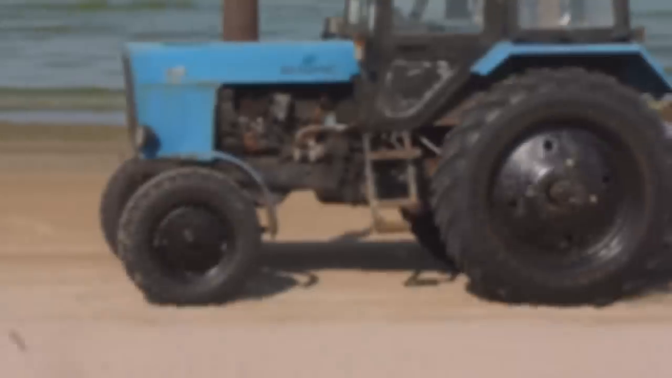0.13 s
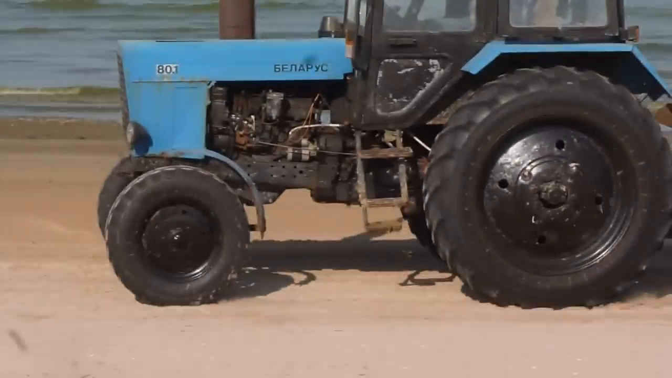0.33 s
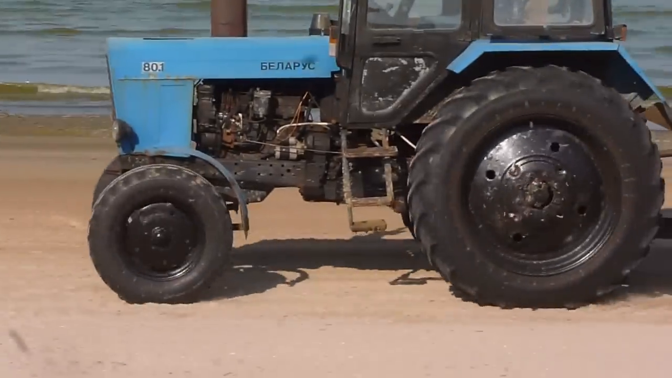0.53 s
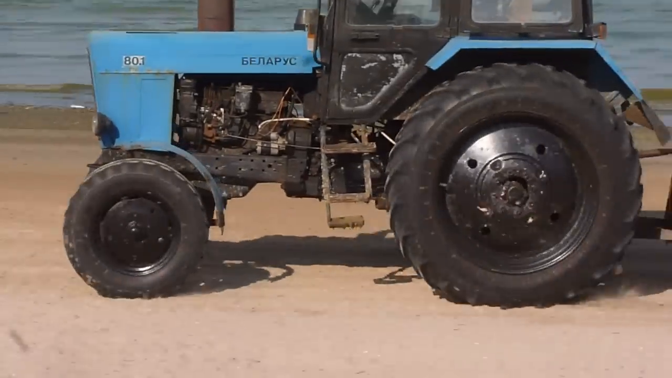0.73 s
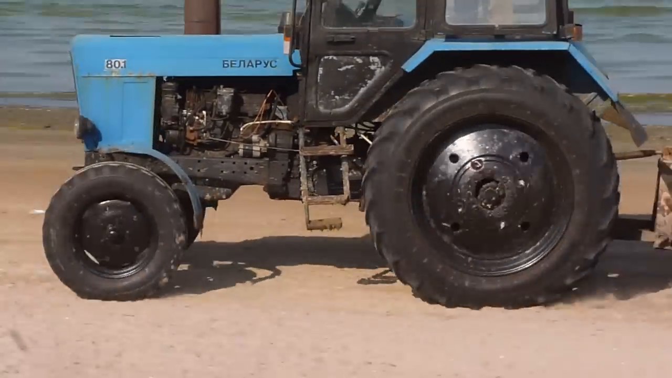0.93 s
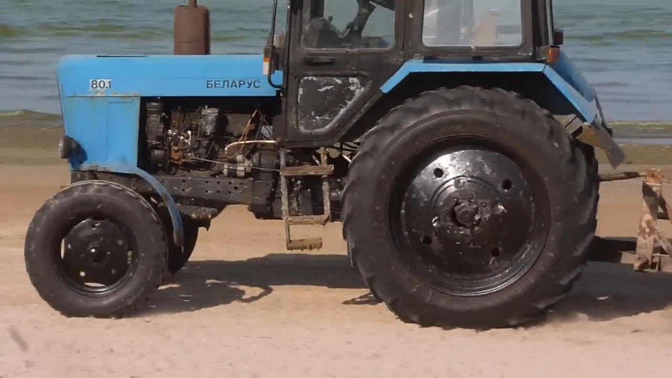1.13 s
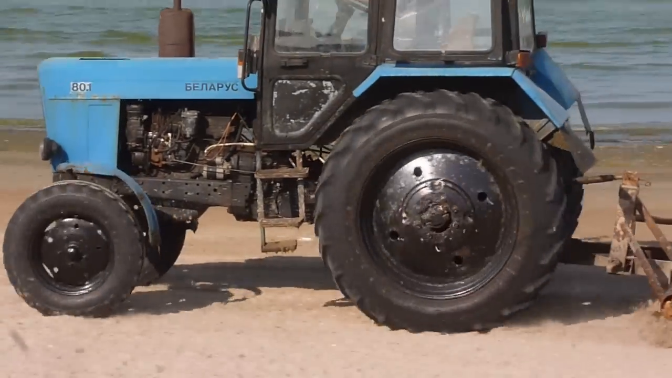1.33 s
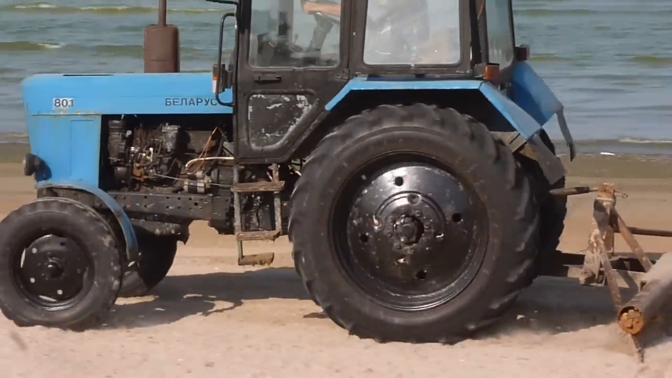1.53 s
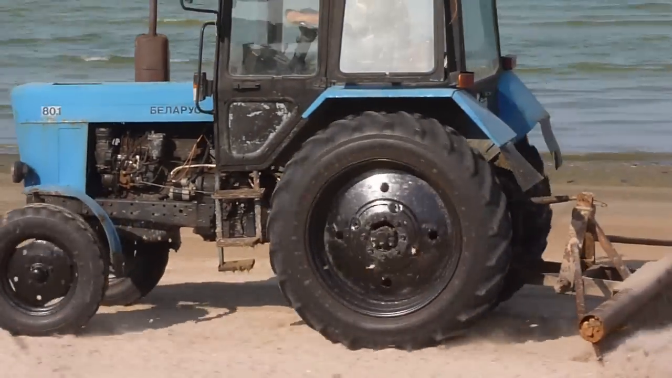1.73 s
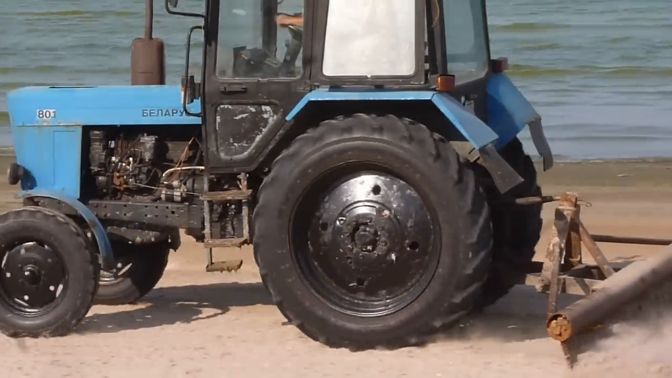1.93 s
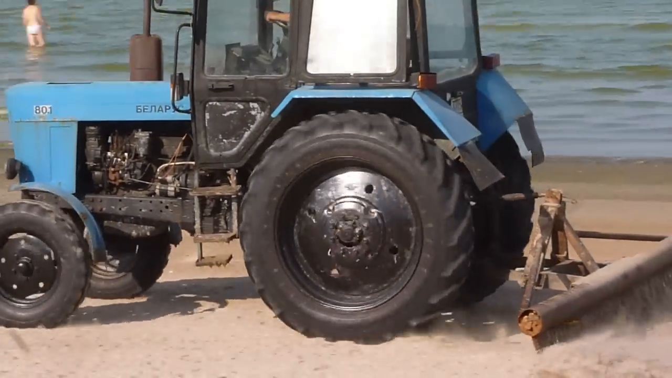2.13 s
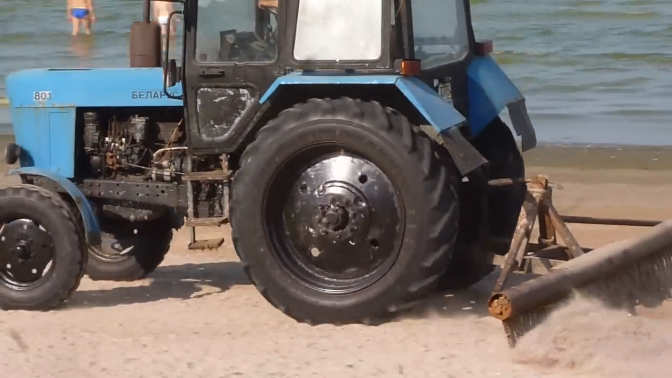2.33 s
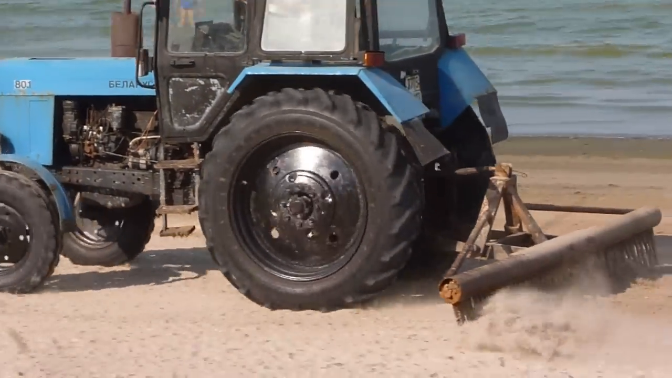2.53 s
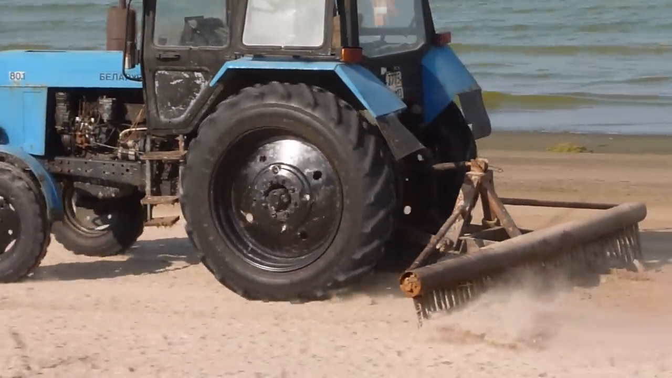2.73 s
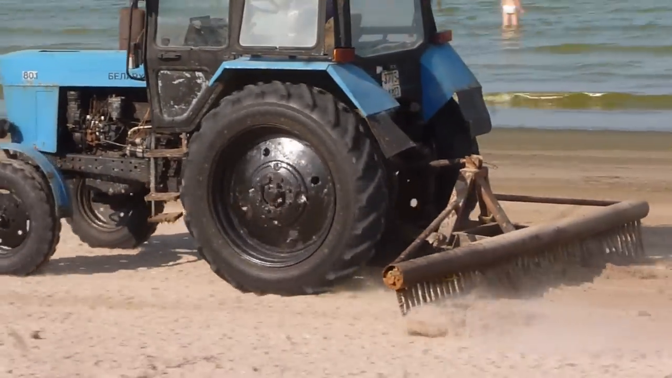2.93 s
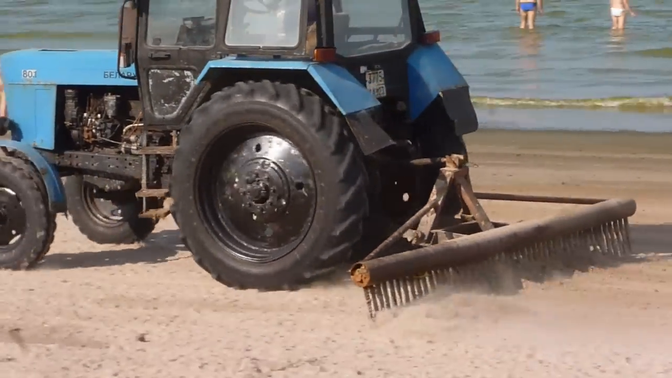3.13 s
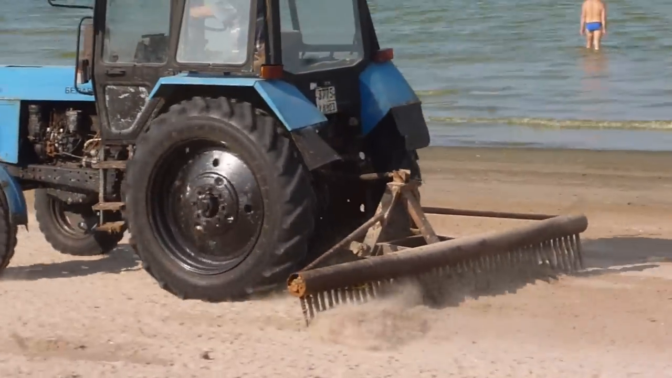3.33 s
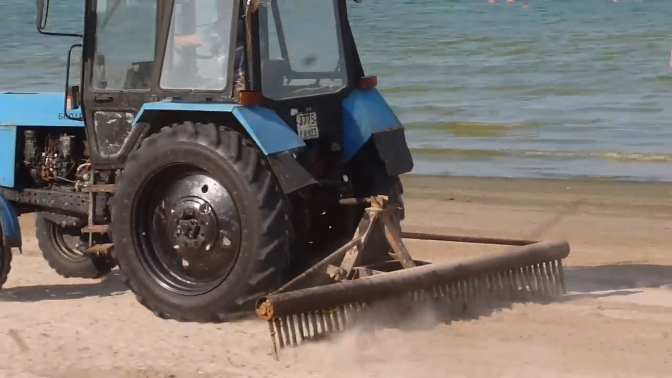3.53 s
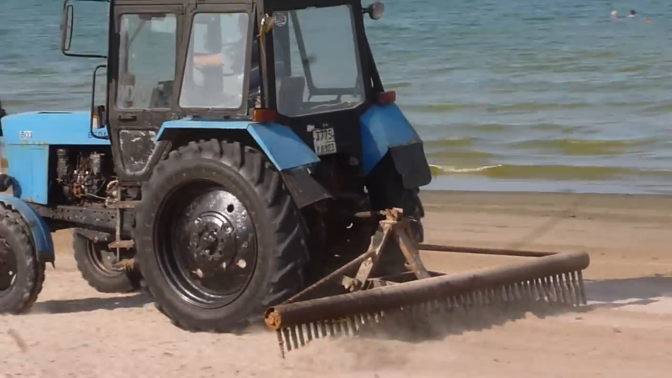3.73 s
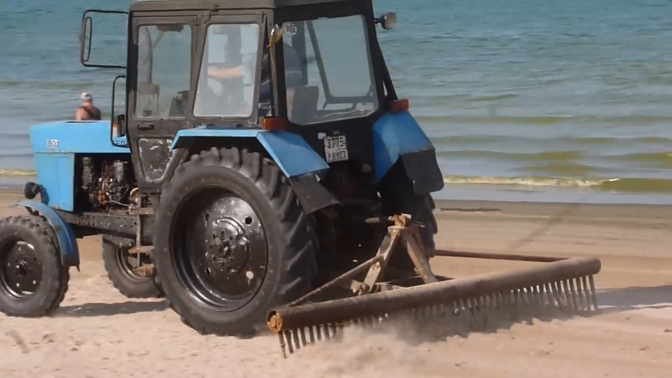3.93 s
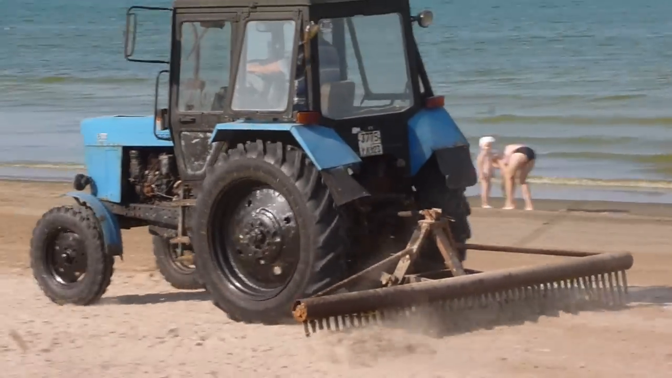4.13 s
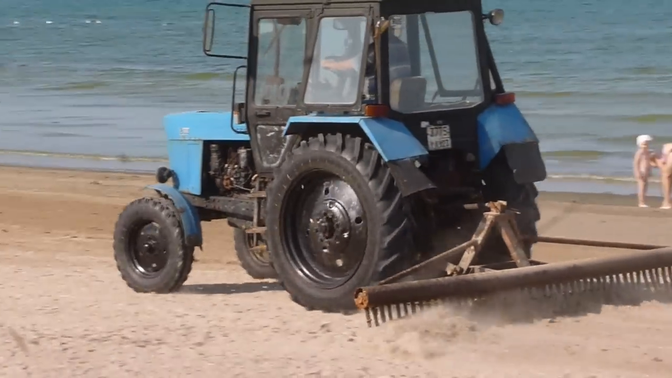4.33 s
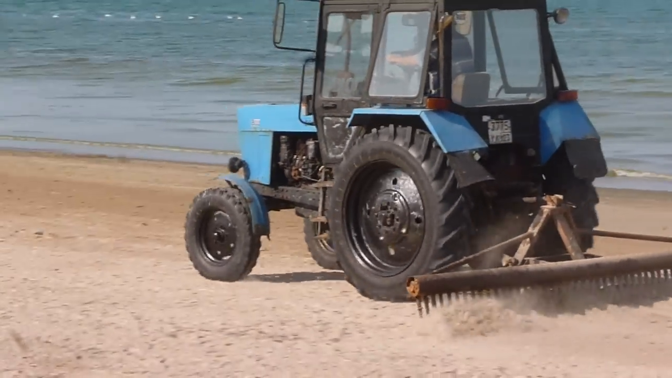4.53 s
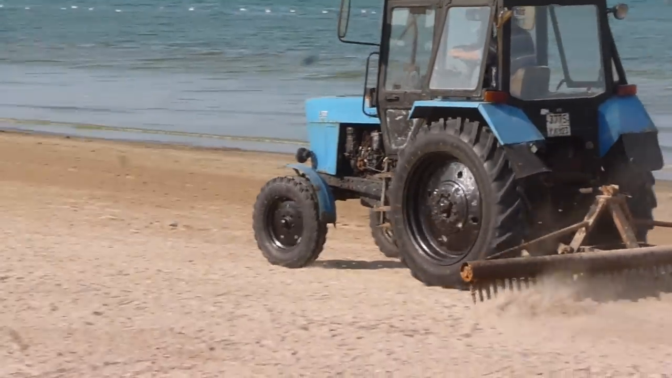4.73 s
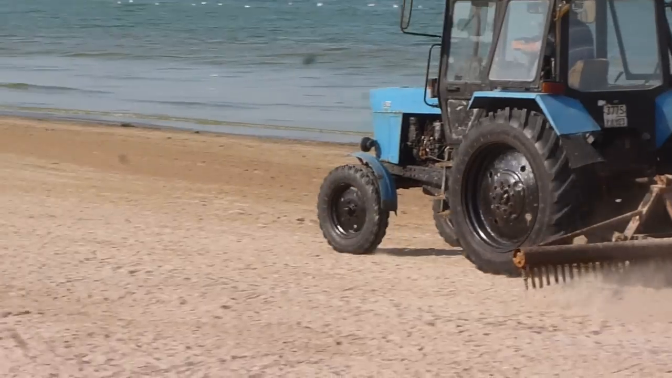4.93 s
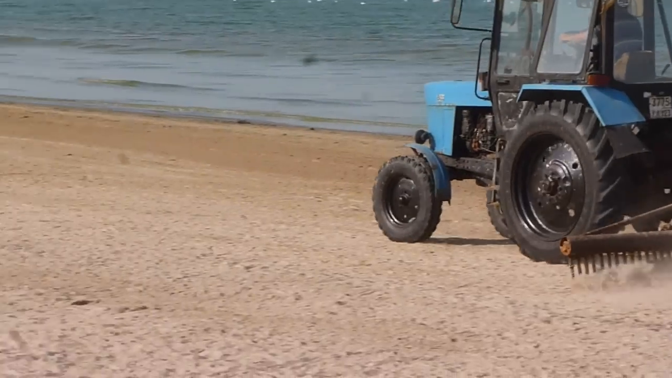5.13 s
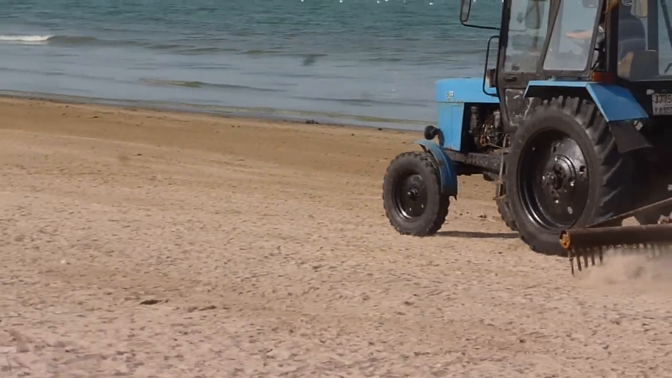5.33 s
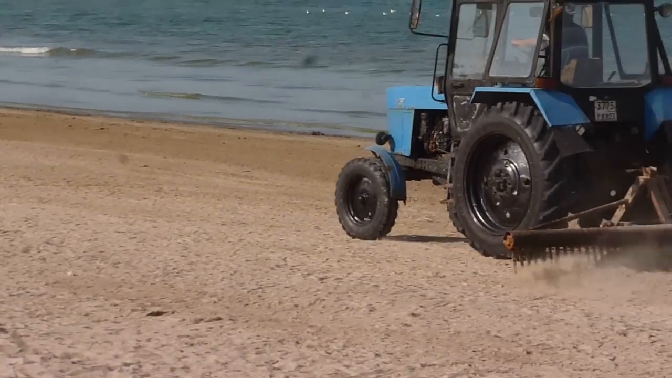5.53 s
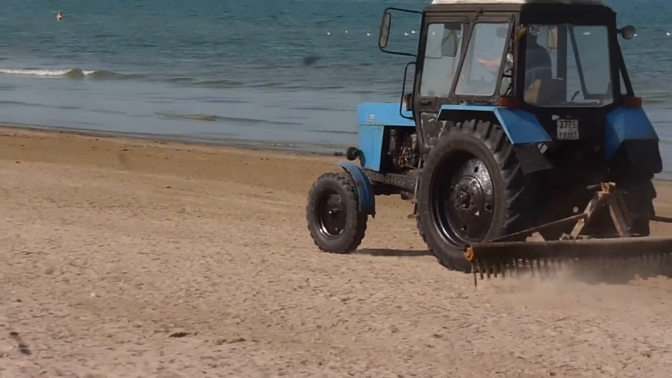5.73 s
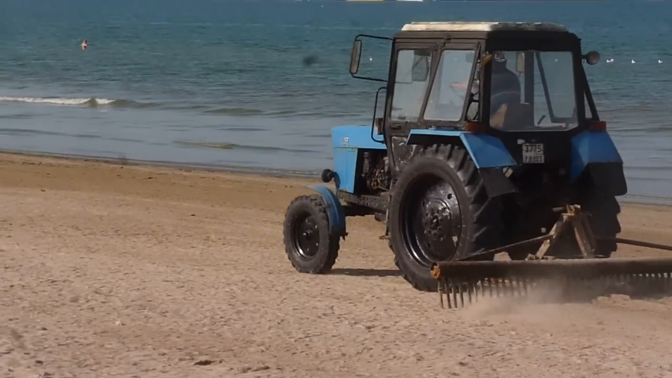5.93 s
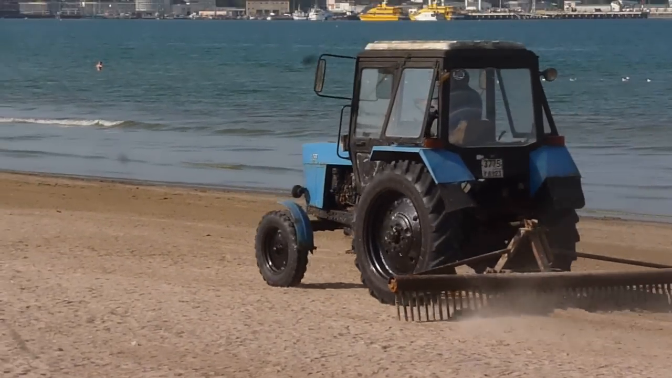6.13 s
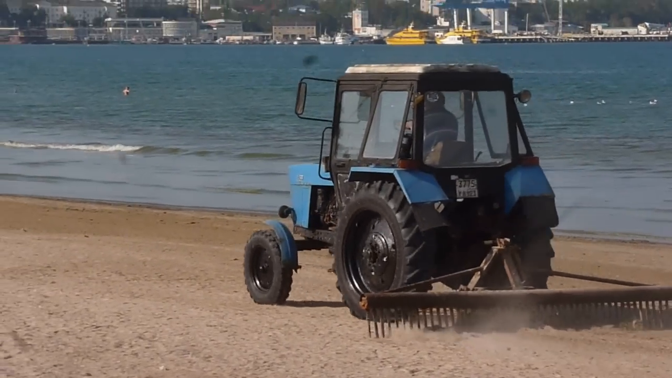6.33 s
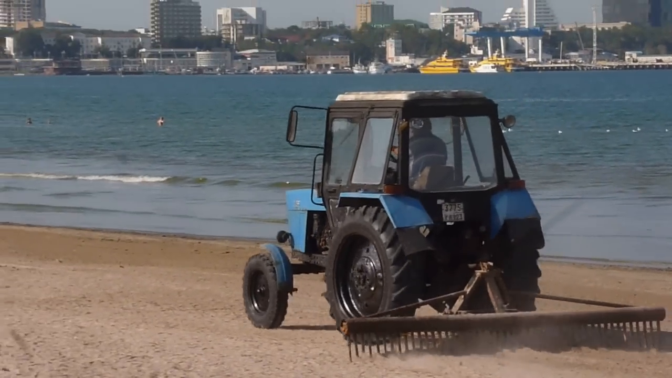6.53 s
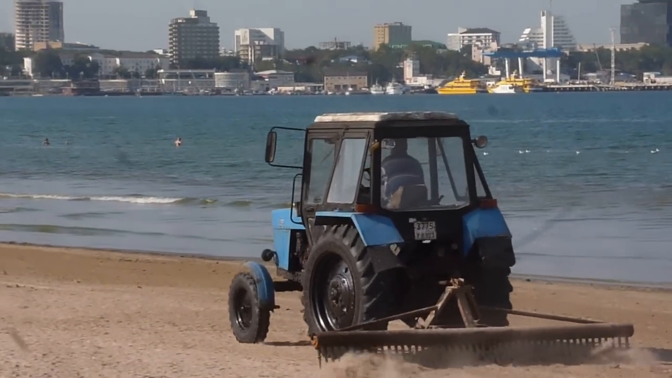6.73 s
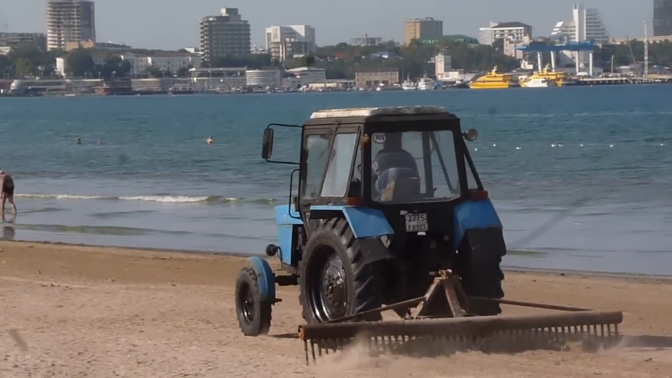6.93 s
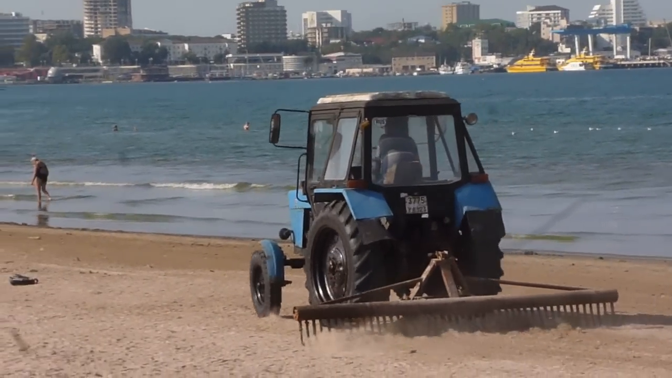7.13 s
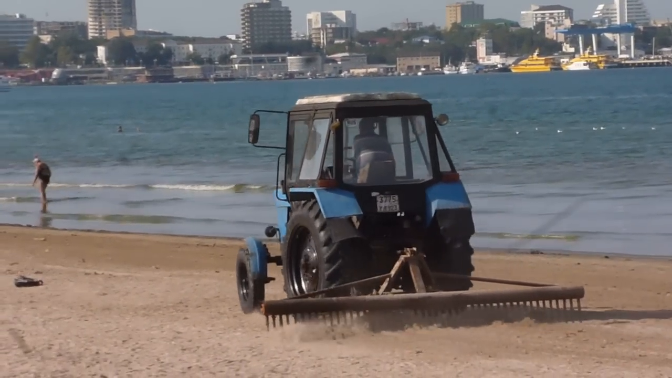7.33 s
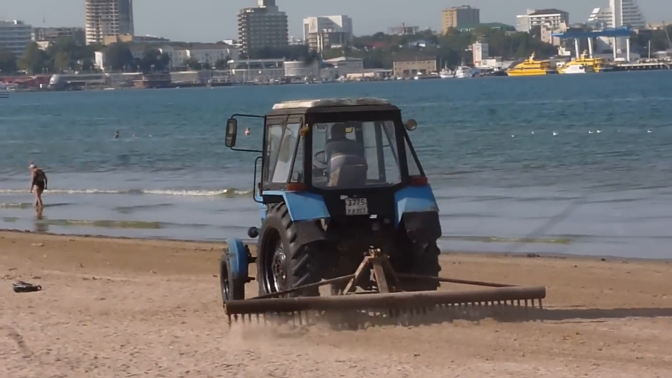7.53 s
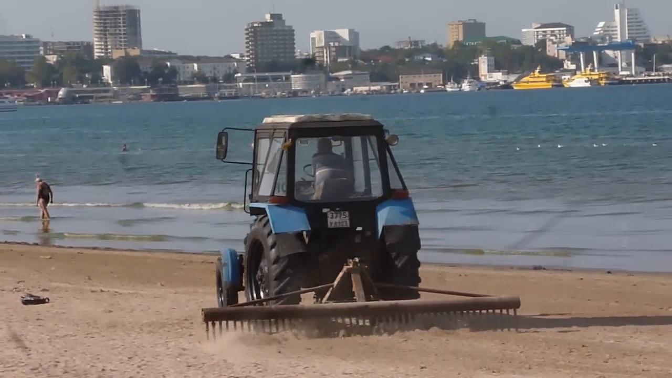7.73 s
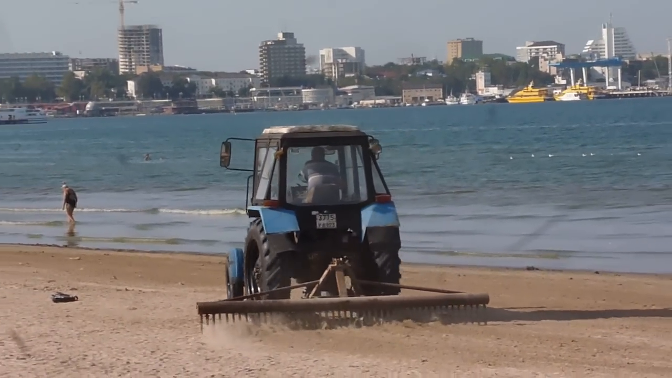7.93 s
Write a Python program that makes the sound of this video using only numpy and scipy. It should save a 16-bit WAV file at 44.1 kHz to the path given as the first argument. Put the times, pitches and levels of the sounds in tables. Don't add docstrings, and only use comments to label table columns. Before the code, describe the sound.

Outdoors on sand, a small bare microphone with thin bass and dull top catches a tractor close by: hard fast diesel clatter, singing gears, loose linkage clinks. After two seconds gusts begin popping and buffeting. The tractor drives off, its engine gradually lower and quieter, with a patchy hiss from the dragged rake, until wind puffs rival the distant engine.

```python
import sys
import numpy as np
from scipy import signal
from scipy.fft import rfft, irfft, next_fast_len
from scipy.io import wavfile
from scipy.ndimage import uniform_filter1d, map_coordinates

SR = 44100
rng = np.random.default_rng(int(sys.argv[2]) if len(sys.argv) > 2 else 0)


def file_out(sig):
    cols = np.atleast_2d(sig).T
    lim = np.clip(cols, -1, 1)
    pcm = np.round(lim * 32767).astype(np.int16)
    wavfile.write(sys.argv[1], SR, pcm)


def voltage_ratio(decibels):
    exponent = np.asarray(decibels, float) / 20
    return 10 ** exponent


N = 355754

# t/s, f/Hz
FIRING_RATE = [
    (0, 73.9),
    (1, 73.4),
    (2, 72.5),
    (2.8, 72.7),
    (3.4, 71.3),
    (4.1, 69.2),
    (5.3, 68.3),
    (6.1, 64.2),
    (8.1, 63.7),
]
# t/s, turn (0 engine side, 1 rear), roar over knock level/dB
TURN = [(0, 0.012, 2), (.5, 0.048, -1.5), (1, 0.0076, 0), (1.5, 0.042, 1), (2, 0.026, 0.5),
        (2.45, 0.019, 0.5), (2.9, 0.14, 0), (3.4, 0.04, 3), (3.8, 0.16, 4.5), (4.2, 0.46, -0.5),
        (5.5, 0.66, -2.5), (7, 0.84, -5), (8.1, 0.62, -4.5)]
# roar level/dB, knock level/dB
CYLINDER_STRENGTH = [
    (-3.5, 5),
    (-7.5, 1.2),
    (-3, 0.3),
    (-11, 3),
]


def unit(x):
    return x / np.sqrt(np.mean(x ** 2) + 1e-20)


def along(points, hz):
    f, v = np.transpose(points)
    return np.interp(np.log(hz + 1), np.log(f + 1), v)


def curve(rows, column=1):
    rows = np.asarray(rows)
    return np.interp(np.arange(N) / SR, rows[:, 0], rows[:, column])


def wobble(rate, order=3):
    knots = rng.standard_normal(int(N * rate / SR) + 4)
    at = np.arange(N) * rate / SR
    if order == 1:
        return np.interp(at, np.arange(len(knots)), knots)
    return map_coordinates(knots, [at], order=order)


def coloured(x, db_of):
    m = next_fast_len(N + 8192)
    return irfft(rfft(x, m) * voltage_ratio(db_of(np.fft.rfftfreq(m, 1 / SR))), m)[:N]


def humps(peaks):
    return lambda hz: sum(db / (1 + (2 * (hz - c) / w) ** 2) for c, w, db in peaks)


def blip(t, hz, turns):
    u = t * hz / turns
    return np.e * u * np.exp(-u) * np.sin(2 * np.pi * (hz * t + rng.random()))


def heard_db():
    # t/s, level/dB
    distance_level = [(0, -36.5), (.32, -34.5), (1.42, -36), (2.15, -35.5), (2.5, -36.5), (2.8, -41.5),
                      (3.2, -40), (3.5, -46), (4.0, -48), (4.5, -51), (5.0, -54), (5.7, -53), (6.3, -58),
                      (6.9, -57.5), (7.4, -56), (7.75, -57), (8.07, -55)]
    # t/s of the lowest point, depth/dB
    ducks = [(2.262, 7), (2.545, 0.5), (2.632, 9.5), (2.93, 5), (3.06, 2), (3.259, 4), (3.629, 6.5),
             (3.86, 2.5), (4.11, 4), (4.23, 1.5), (4.46, 3), (4.78, 2.5), (4.97, 2), (5.57, 2), (5.79, 3.5),
             (6.19, -1.5), (6.53, 1), (6.69, 0), (6.75, 2), (7.0, 0.5), (7.05, 0)]
    attack_s, release_s = 0.06, 0.089
    s, depth_db = np.transpose(ducks)[..., None]
    late = np.arange(0, N, 64) / SR - s
    falling, recovering = np.clip(1 + late / attack_s, 0, 1), np.exp(-np.abs(late) / release_s)
    dips = depth_db * np.where(late < 0, falling, recovering)
    return curve(distance_level) - np.repeat(dips.sum(axis=0), 64)[:N]


def bursts(cycles, strength_db, scatter_db, fall, rest):
    firing = np.floor(4 * cycles).astype(int)
    luck_db = scatter_db * rng.uniform(-1.3, 1, firing[-1] + 1)
    size = voltage_ratio(np.asarray(strength_db)[firing % 4] + luck_db[firing])
    shape = uniform_filter1d(size * np.exp(-fall * (4 * cycles - firing)), size=150)
    return unit((rest + shape) * rng.standard_normal(N))


def combustion(cycles):
    # f/Hz, level/dB per Hz
    side_on = [(35, -85), (60, -44), (200, -25), (222, -14), (238, -23.5), (274, -16.5), (410, -17.5),
               (492, -12), (738, -0.5), (960, -7), (1150, -5), (2430, -9), (3580, -5), (5470, -14),
               (7560, -36.5), (9830, -74.5), (16600, -120)]
    # f/Hz, level/dB per Hz
    rear_on = [(88, -36), (150, -11.5), (280, -2), (505, -9), (748, -3), (896, -10), (1110, -2.5),
               (1940, -12), (2140, -12), (2870, -12), (5020, -20.5), (6310, -32.5), (7560, -45.5),
               (9830, -75), (16600, -120)]
    # f/Hz, width/Hz, level/dB (negative = a
    panels = [(236, 89, 3.5), (590, 150, 4), (275, 16, -5), (670, 27, -0.5), (695, 130, -1), (1000, 26, 2),
              (1230, 260, 3), (1360, 150, -0.5), (1713, 120, 4), (2258, 60, 5.5), (2660, 690, 4.5),
              (3570, 120, 2), (4240, 200, 3.5), (4370, 100, -6.5), (5140, 260, -2)]
    # f/Hz, width/Hz,
    # level/dB (negative = weaker)
    rear_parts = [(1040, 120, 4.5), (1790, 100, 4.5), (2153, 82, 8.5), (2260, 60, -4), (3020, 230, -1),
                  (3900, 120, -0.5), (4170, 160, -4), (5250, 200, 1)]
    roar_db, knock_db = np.transpose(CYLINDER_STRENGTH)
    roar = bursts(cycles, roar_db, scatter_db=2.5, fall=2.5, rest=.6)
    knock = bursts(cycles - .04, knock_db, scatter_db=2.2, fall=1.3, rest=0.56)
    high = lambda hz: 1 / (1 + (2100 / (hz + 1)) ** 4)
    blows = voltage_ratio(curve(TURN, column=2)) * coloured(roar, lambda hz: 10 * np.log10(1 - high(hz)))
    blows += coloured(knock, lambda hz: 10 * np.log10(high(hz)))
    side = coloured(blows, lambda hz: humps(panels)(hz) + along(side_on, hz))
    rear = coloured(blows, lambda hz: humps(panels + rear_parts)(hz) + along(rear_on, hz))
    treble = lambda x: np.std(coloured(x, lambda hz: -99. * ((hz < 2000) | (hz > 6000))))
    return side / treble(side), rear / treble(rear)


def swell_db(multiple):
    # multiple of the cycle rate, t/s, half length/s, swell level/dB
    loads = [(40, 1.7, 0.73, 0), (40, .78, .1, 3), (40, 1.146, 0.099, 11), (40, 1.5, 0.12, 12.5),
             (40, 2.33, 0.073, 1), (40, 3.1, .1, 10), (20, 1.7, .4, 4), (16.2, 1.8, .5, 5.5),
             (27.5, 0.73, 0.53, 4), (57.4, 2.504, 0.061, 13), (61.5, 2.43, .1, 5.5), (57.4, 2.85, .15, 9),
             (57.4, 4, 0.19, 12.5), (107, 7.8, 0.34, 17), (138, 7.97, .12, 26), (40, 2.7, 0.18, 6),
             (40, 2.87, 0.13, -16), (37.2, 0.89, 1, 7.5), (33.1, 1.3, 0.86, 4.5), (57.4, 3.2, 0.35, 10),
             (61.5, 3.1, 0.42, 8), (65.3, 3.1, .35, 5.5), (97.3, 2.5, .4, 13.5), (107, 7.8, .2, 19),
             (13, 1.2, 0.86, -1)]
    t = np.arange(0, N, 64) / SR
    near = [row for row in loads if abs(row[0] / multiple - 1) < .03]
    db = sum(db * np.exp(-((t - s) / half) ** 2) for k, s, half, db in near)
    return np.repeat(db + 0 * t, 64)[:N]


def shaft_tones(cycles):
    # multiple of the cycle rate, level/dB under the engine
    multiples = [(4, -40.5), (5, -61.5), (6, -53.5), (7, -50.5), (8, -48), (9, -47.5), (12, -39.5),
                 (13, -19.5), (13.8, -26), (16.2, -30.5), (18, -31), (19, -32), (20, -29.5), (21, -29.5),
                 (27.1, -20.5), (28, -25.5), (33.1, -18), (37.2, -19.5), (40, -14), (57.1, -18.5),
                 (61.5, -14), (65.3, -19), (97.3, -27), (107, -36.5), (138, -29.5)]
    out = np.zeros(N)
    for k, db in multiples:
        strength = voltage_ratio(db + swell_db(k) + 1.6 * wobble(5, order=1))
        out += strength * np.sin(2 * np.pi * k * cycles + .018 * k * wobble(7, order=1))
    return out


def clatter(cycles, turned, scatter_db):
    # f/Hz, level/dB, t60/s, change from behind level/dB
    struck_parts = [(588.5, -0.5, 0.23, 5), (692, -3, 0.2, -0.5), (721.4, 0.5, 0.18, 1.5),
                    (1047, -1.5, 0.17, -0.5), (1158, 4, 0.06, -1.5), (1647, -5, 0.11, 1),
                    (2130, -12.5, 0.028, 2.5), (2900, 7, 0.013, -4.5), (3100, -9.5, 0.044, -3.5),
                    (3460, -7.5, 0.027, -1.5), (4086, 4.5, 0.078, -6.5), (4540, 0, 0.058, -3.5)]
    starts = np.flatnonzero(np.diff(np.floor(4 * cycles)))
    hz, db, t60, behind_db = np.transpose(struck_parts)[..., None].astype(np.float32)
    t, out = np.arange(SR // 32, dtype=np.float32) / SR, np.zeros(N + SR)
    dying = voltage_ratio(db - 60 * t / t60) * (1 - np.exp(-t / 0.0013)) * np.cos(np.pi / 2 * t / t[-1])
    lucks = rng.uniform(-1.2, 1, (len(starts), 3, len(struck_parts), 1)).astype(np.float32)
    for k, (s, (size, pitch, phase)) in enumerate(zip(starts, lucks)):
        knock_db = CYLINDER_STRENGTH[(k + 1) % 4][1]
        level = voltage_ratio(knock_db + scatter_db * size + behind_db * np.float32(turned[s])) * dying
        ringing = np.sin(2 * np.pi * hz * (1 + .01 * pitch) * t + 1.8 * phase)
        out[s:s + len(t)] += np.sum(level * ringing, axis=0)
    return unit(out[:N])


def thump(cycles):
    ring_hz, late_cycles, second_db = 724, 0.0495, 0.5
    half = 2 * (cycles - late_cycles)
    since_s = half % 1 * 2 / curve(FIRING_RATE)
    u = since_s * ring_hz / 2.2
    strength = voltage_ratio(second_db * (np.floor(half) % 2) + 1.1 * wobble(30, order=1))
    return unit(strength * u * np.exp(-u) * np.sin(2 * np.pi * ring_hz * since_s))


def tappet(cycles):
    ring_hz, scatter_db, fade_db_per_s = 3543, 0.5, 5
    starts = np.flatnonzero(np.diff(np.floor(4 * cycles)))
    luck = rng.random((len(starts), 2))
    t, out = np.arange(SR // 150) / SR, np.zeros(N + SR)
    for k, (s, (size, pitch)) in enumerate(zip(starts, luck)):
        db = CYLINDER_STRENGTH[(k + 1) % 4][1] + 2 * scatter_db * size - fade_db_per_s * s / SR
        out[s:s + len(t)] += voltage_ratio(db) * blip(t, ring_hz * (1 + .14 * (pitch - .5)), turns=14.0)
    return unit(out[:N])


def engine():
    first_cycle = .93
    cycles = first_cycle + np.cumsum(curve(FIRING_RATE)) / 4 / SR
    turned = np.clip(curve(TURN), 0, 1)
    side, rear = combustion(cycles)
    body = (1 - turned) * (side + 1.08 * shaft_tones(cycles)) + turned * rear
    body += voltage_ratio(-8.0 - 2.2 * turned) * clatter(cycles - .03, turned, scatter_db=4.0)
    body += voltage_ratio(-17.5) * (1 - turned) * thump(cycles)
    body += voltage_ratio(-21.5) * (1 - turned) * tappet(cycles - .03)
    return voltage_ratio(heard_db() + 1.0) * body


def harrow():
    # f/Hz, level/dB per Hz
    sand = [(500, -21.5), (1500, -5.5), (4000, -3), (6500, -18.5), (7800, -53)]
    patchy = rng.standard_normal(N) * voltage_ratio(2.2 * wobble(12))
    hiss = unit(coloured(patchy, lambda hz: along(sand, hz)))
    return voltage_ratio(heard_db() - 6) * np.clip(curve(TURN) + .1, 0, 1) * hiss


def single_rings():
    # t/s, peak level/dB, f/Hz
    chirps = [(.004, -21, 3410), (.061, -22, 3550), (.172, -23, 3500), (.29, -24, 4000), (.658, -23, 4000),
              (.978, -25, 3600), (0.0465, -22, 3440), (0.2638, -20, 3570), (0.4809, -21.5, 3530),
              (0.547, -26, 3020), (0.644, -17, 3650), (0.702, -20, 3190), (0.74, -19.5, 3570),
              (0.824, -19.5, 3960), (0.834, -19, 4230), (0.881, -20, 4200), (0.169, -28, 1990),
              (.252, -35, 1160), (.272, -37, 1164), (0.873, -23, 3630), (0.9183, -19.5, 3580),
              (1.099, -20, 3530), (1.2012, -17.5, 3700), (1.3085, -20.5, 3720), (1.3638, -21, 3500),
              (1.8467, -23, 3700), (2.19, -22, 3630), (3.187, -32, 3000), (7.03, -44, 3100),
              (7.787, -43, 3200), (7.975, -36, 2930)]
    out, t = np.zeros(N + SR), np.arange(SR // 80) / SR
    for s, db, hz in chirps:
        out[round(s * SR):][:len(t)] += voltage_ratio(db - 4.0) * blip(t, hz, turns=3.4)
    return out[:N]


def strokes():
    # t/s, peak level/dB
    hard_knocks = [(0.0991, -23), (0.1689, -24), (0.212, -36), (0.3166, -22), (0.3829, -29), (0.4388, -30),
                   (0.5331, -19), (0.7925, -31), (0.9686, -22.5), (1.028, -33), (1.1436, -20),
                   (1.1726, -27), (1.5707, -31), (1.7504, -28), (1.7778, -33), (1.8033, -18.5),
                   (1.9129, -22.5), (1.9564, -30), (2.0272, -32), (2.0676, -21), (2.3006, -26.5),
                   (2.345, -34), (2.3988, -30), (2.4712, -20), (2.6867, -32), (2.8498, -38), (3.0179, -26),
                   (3.0723, -39), (3.185, -25), (3.2115, -38), (3.2389, -42), (3.3502, -32), (3.593, -43),
                   (3.805, -36), (4.023, -40), (4.1483, -37), (4.6292, -39), (4.7175, -38), (4.8327, -45),
                   (4.8896, -39), (5.2842, -50), (5.7766, -45), (5.8938, -46), (6.2171, -42), (6.4071, -47),
                   (6.5952, -43), (6.7062, -42), (6.8307, -52), (7.0192, -44), (7.1375, -44), (7.348, -50),
                   (7.4567, -42), (7.5971, -51), (7.6568, -49), (7.8478, -44), (7.8942, -41), (8.0371, -38)]
    # f/Hz, level/dB per Hz
    metal = [(900, -28), (2200, -5.5), (2950, 2.5), (3500, -4.5), (4800, -6), (6500, -19), (7800, -52)]
    rise_s = 0.0045
    size, u = np.zeros(N + SR), np.arange(SR // 30) / SR / rise_s
    for s, db in hard_knocks:
        size[round(s * SR):][:len(u)] += voltage_ratio(db - 12) * np.e * u * np.exp(-u)
    return size[:N] * unit(coloured(rng.standard_normal(N), lambda hz: along(metal, hz)))


def block():
    # t/s, peak level/dB, f/Hz
    iron = [(0.126, -30, 716), (0.366, -28, 760), (0.439, -30, 603), (0.507, -31, 598), (0.684, -29, 732),
            (0.813, -27, 712), (1.012, -31, 732), (1.065, -30, 678), (1.119, -24, 745), (1.174, -22, 754),
            (1.447, -22, 733), (1.501, -28, 720), (1.585, -27, 593), (1.684, -29, 754), (2.017, -27, 708),
            (2.499, -23, 713)]
    # t/s, peak level/dB, f/Hz
    covers = [
        (0.6983, -31, 1150),
        (0.7367, -30, 1180),
        (0.822, -28, 1193),
        (0.8458, -28, 1190),
        (0.8939, -29, 1180),
        (0.9457, -30, 1180),
        (1.9165, -29, 1130),
        (2.0966, -27.5, 1130),
        (2.4265, -29, 1020),
        (2.469, -27.5, 1050),
    ]
    rise_s = .006
    out, t = np.zeros(N + SR), np.arange(SR // 20) / SR
    for s, db, hz in [*iron, *covers]:
        out[round(s * SR):][:len(t)] += voltage_ratio(db - 7.5) * blip(t, hz, turns=rise_s * hz)
    return out[:N]


def over_sand(x, slide):
    # f/Hz, width/Hz, level/dB
    bounce = [
        (2450, 130, -5),
        (3850, 140, -10),
        (4380, 150, -5),
    ]
    blurs_s = 4.5
    near = coloured(x, humps(bounce))
    far = coloured(x, humps(np.array(bounce) * [slide, 1, 1]))
    t = np.arange(N) / SR
    gone = np.clip(t / 2.6, 0, 1)
    blurred = .6 * np.clip(t / blurs_s, 0, 1) ** 2
    return (1 - blurred) * ((1 - gone) * near + gone * far) + blurred * x


def gust_db():
    # start t/s, hold/s, buffeting level/dB
    gusts = [(2.142, 0.079, -48.5), (2.595, 0.058, -41), (2.787, 0.013, -49), (2.876, 0.08, -51),
             (3.03, 0.084, -48.5), (3.326, 0.039, -51), (3.516, 0.026, -48.5), (3.584, 0.046, -40.5),
             (3.63, 0.099, -42), (3.842, 0.048, -41.5), (3.946, 0.015, -43), (4.054, 0.035, -41),
             (4.168, 0.051, -42), (4.3, 0.4, -40.5), (4.702, 0.4, -44.5), (5.17, 0.09, -41.5),
             (5.346, 0.14, -44.5), (5.5, .05, -49.5), (5.594, 0.016, -46.5), (5.702, 0.056, -47),
             (5.796, 0.13, -45), (6.02, 0.61, -45), (6.702, 0.095, -47.5), (6.92, 0.069, -44.5),
             (7.018, 0.12, -48), (7.261, 0.028, -44.5), (7.35, 0.026, -47), (7.414, .02, -52.5),
             (7.474, .025, -52), (7.548, 0.045, -52), (7.734, 0.016, -48.5), (7.775, .02, -52),
             (7.81, 0.042, -49), (7.88, .05, -58), (7.98, .01, -53), (8.06, .03, -48.5)]
    # t/s, half length/s, depth/dB
    still = [(4.195, .006, 9), (5.164, 0.0059, 3), (6.054, .005, 1), (6.52, .006, 3), (6.772, .006, 4),
             (7.273, .007, 8), (3.593, 0.011, 14), (3.635, 0.0092, 0), (3.922, .008, 10),
             (3.937, 0.0074, 8), (4.026, .015, 7), (4.15, 0.0097, 10), (4.313, 0.0063, 11),
             (4.346, 0.009, 12), (4.392, .01, 5), (4.58, 0.012, 19), (4.647, .012, 3), (4.78, 0.0071, 4),
             (4.9, .012, 4), (5.078, .015, 7), (5.14, 0.0089, 12), (5.294, 0.012, 8), (5.655, 0.014, -1),
             (5.853, 0.01, 11), (6.072, 0.0061, 12), (6.01, .008, 8), (6.117, 0.013, 10), (6.164, .008, 10),
             (6.24, .008, 1), (6.264, 0.007, 8), (6.406, 0.016, 4), (6.455, 0.0088, 7), (6.587, 0.0082, 9),
             (6.63, .012, 2), (6.68, 0.013, 14), (6.746, 0.0064, 11), (6.908, 0.01, 6), (7.015, 0.0083, 10),
             (7.196, 0.011, 4), (7.516, .014, 8), (7.648, 0.032, 20), (7.764, .01, 14), (7.866, 0.014, 18),
             (8.02, .018, 14)]
    rise_db_per_s, fall_db_per_s, calm_db = 499, 302, -56.5
    s, hold, db = np.transpose(gusts)[..., None]
    t = np.arange(0, N, 64) / SR
    puffs = db - rise_db_per_s * np.clip(s - t, 0, None) - fall_db_per_s * np.clip(t - s - hold, 0, None)
    at, half, depth_db = np.transpose(still)[..., None]
    lulls = np.sum(depth_db * np.exp(-((t - at) / half) ** 2), axis=0)
    return uniform_filter1d(np.repeat(np.maximum(puffs.max(axis=0), calm_db) - lulls, 64)[:N], size=64)


def buffeting():
    # f/Hz, level/dB per Hz
    buffet = [(15, -103), (25, -78), (43, -60), (51, -59.5), (150, -12), (317, 0), (422, -2.5),
              (849, -10.5), (1480, -18), (1800, -27.5), (2340, -50), (3960, -120)]
    flicks = (rng.random(N) < 330 / SR) * np.clip(rng.standard_normal(N), -1.5, 1.5)
    eddies = unit(flicks * voltage_ratio(0.91 * wobble(63)))
    flutter = coloured(eddies + 0.7 * rng.standard_normal(N), lambda hz: along(buffet, hz))
    return flutter / np.sqrt(np.abs(uniform_filter1d(flutter ** 2, size=1300)) + 1e-12)


def eddy_pops():
    # t/s, peak level/dB, f/Hz, crack over pop level/dB
    big_eddies = [(6.78, -37.5, 400, 1.5), (2.659, -27, 622, -12), (3.579, -27, 440, -9),
                  (3.669, -26.5, 361, 0), (3.863, -24.5, 430, -2.5), (3.899, -23, 457, -12),
                  (4.089, -24, 960, -16), (4.166, -22.5, 434, -8), (4.202, -27, 800, -4),
                  (4.492, -25.5, 563, -1), (4.757, -20.5, 427, -8.5), (4.798, -23, 420, -16),
                  (4.919, -24, 418, -8), (4.984, -20, 416, -30), (5.101, -25, 533, -15),
                  (5.173, -27, 433, -5), (5.212, -22, 597, -9), (5.324, -25.5, 494, -7),
                  (5.744, -29, 900, -1), (5.753, -26, 382, -0.5), (6.021, -28.5, 535, -4),
                  (6.059, -25.5, 450, -7), (6.143, -27.5, 595, -6), (6.362, -26, 590, -9),
                  (6.524, -25.5, 421, -16), (6.921, -32, 350, 0), (7.091, -34.5, 379.3, 3),
                  (7.281, -33.5, 450, -5), (7.352, -32.5, 520, -13), (7.817, -30, 450, -5)]
    # t/s, peak level/dB, f/Hz
    thuds = [(2.609, -26, 490), (2.651, -24.5, 650), (3.614, -27, 400), (3.729, -30, 510),
             (3.845, -33, 597), (3.959, -29.5, 356), (4.058, -30, 520), (4.075, -24.5, 425),
             (4.216, -26.5, 670), (4.334, -33, 483), (4.38, -23.5, 463), (4.45, -24, 382),
             (4.542, -29, 493), (4.575, -25, 438), (4.667, -30, 440), (4.728, -26, 402), (4.768, -26, 540),
             (4.863, -28, 449), (4.945, -28, 407), (4.955, -35, 494), (5.111, -24.5, 482),
             (5.232, -34, 412), (5.266, -32, 514), (5.361, -27.5, 430), (5.405, -30, 420),
             (5.444, -33, 451), (5.607, -33.5, 410), (5.714, -38, 411), (5.8, -31, 488), (5.814, -31, 400),
             (5.828, -30, 449), (5.881, -30, 505), (5.896, -30, 536), (5.914, -38, 380),
             (5.933, -31.5, 473), (6.034, -36, 500), (6.197, -34, 368), (6.221, -33, 541),
             (6.248, -33, 499), (6.309, -28, 470), (6.38, -29.5, 501), (6.438, -34, 403), (6.484, -29, 455),
             (6.549, -34, 422), (6.559, -33, 390), (6.598, -35, 453), (6.818, -38, 381), (6.939, -30, 429),
             (6.959, -32, 548), (7.081, -35, 405), (7.124, -35, 320), (7.225, -34, 467),
             (7.374, -30.5, 470), (7.597, -33, 360), (7.739, -35, 392), (7.833, -37, 383),
             (7.844, -29.5, 302), (7.884, -34.5, 376), (7.984, -32.5, 414), (8.045, -31.5, 426)]
    rows = [(*pop, 0.61) for pop in big_eddies]
    rows += [(s, db + 0.5, hz, -11, 0.65) for s, db, hz in thuds]
    out, t = np.zeros(N + SR), np.arange(SR // 40) / SR
    for s, db, hz, crack_db, turns in rows:
        crack = voltage_ratio(crack_db + 6.5 - hz / 150) * blip(t, 870, turns=0.59)
        out[round(s * SR):][:len(t)] += voltage_ratio(db - 5.5) * (blip(t, hz, turns=turns) + crack)
    return coloured(out[:N], lambda hz: -20 * np.log10(1 + (140 / (hz + 1)) ** 4.0))


def wind():
    onset = np.clip((np.arange(N) / SR - 2.15) / 0.05, 0, 1)
    low_band = lambda hz: -20 * np.log10(1 + (hz / 200) ** 3 + (130 / (hz + 1)) ** 3.0)
    draught = unit(coloured(rng.standard_normal(N), low_band))
    gusts_db = gust_db()
    draught_db = -65.0 + 0.15 * (gusts_db + 51.0)
    return onset * (voltage_ratio(gusts_db) * buffeting() + voltage_ratio(draught_db) * draught) + eddy_pops()


def scene():
    tractor = engine() + single_rings() + strokes() + block()
    return (over_sand(tractor, slide=1.031) + harrow() + wind())[None]


def low_pass(x):
    return signal.sosfilt(signal.butter(12, 7710, fs=SR, output="sos"), x)


def record(dry):
    bass_cut = lambda hz: -20 * np.log10(1 + (75 / (hz + 1)) ** 4)
    band = lambda hz: bass_cut(hz) - 60 * np.clip((hz - 7200) / 800, 0, 1) ** 2
    return low_pass(coloured(dry[0], band)[None])


dry = scene()
out = record(dry)
file_out(out)
```